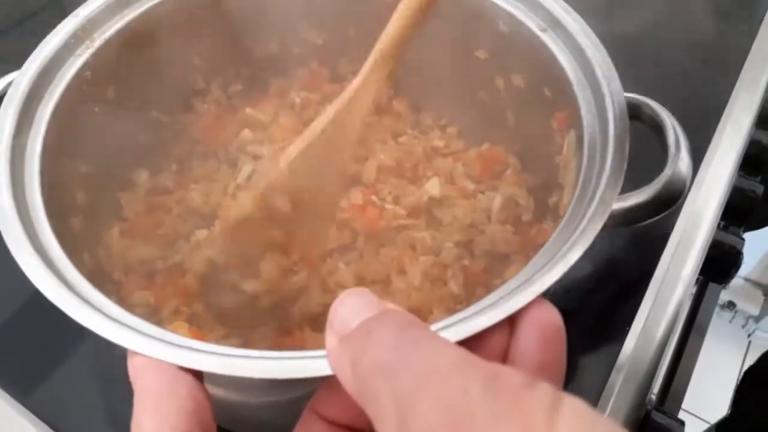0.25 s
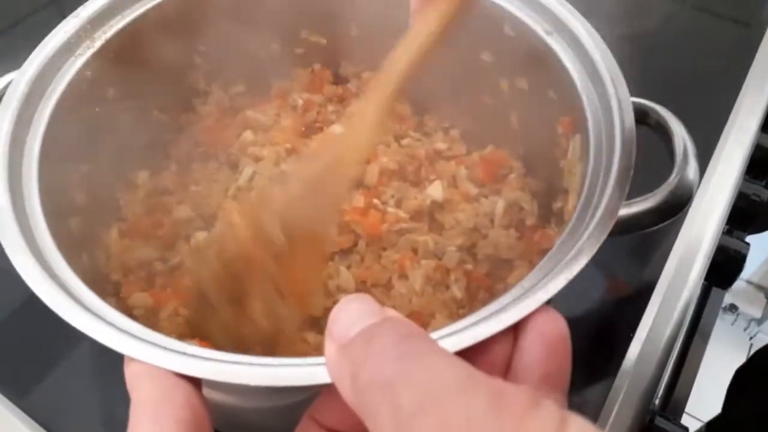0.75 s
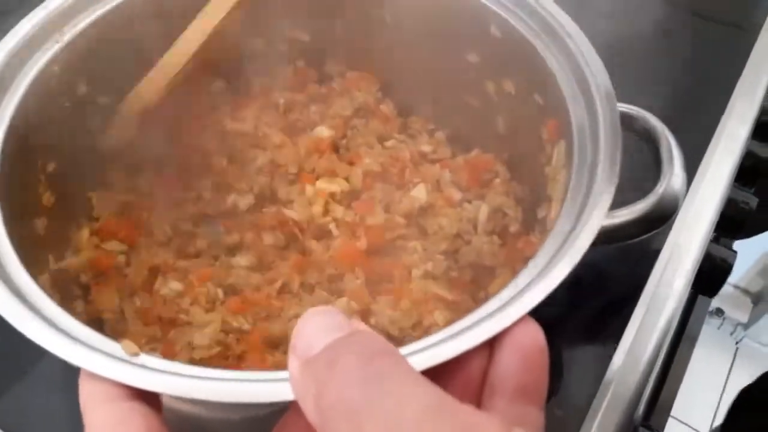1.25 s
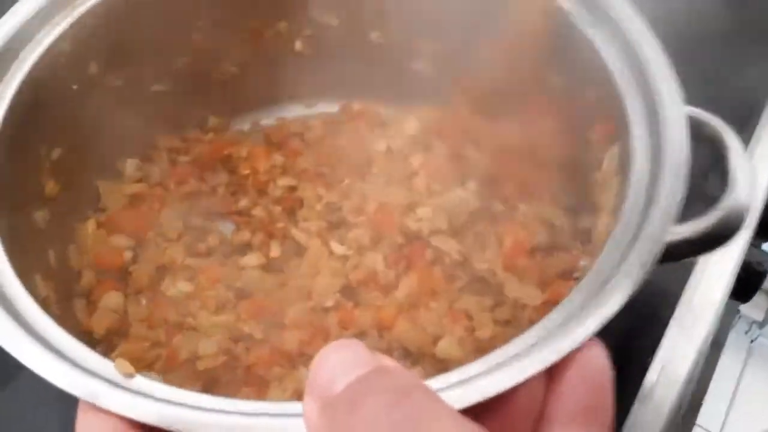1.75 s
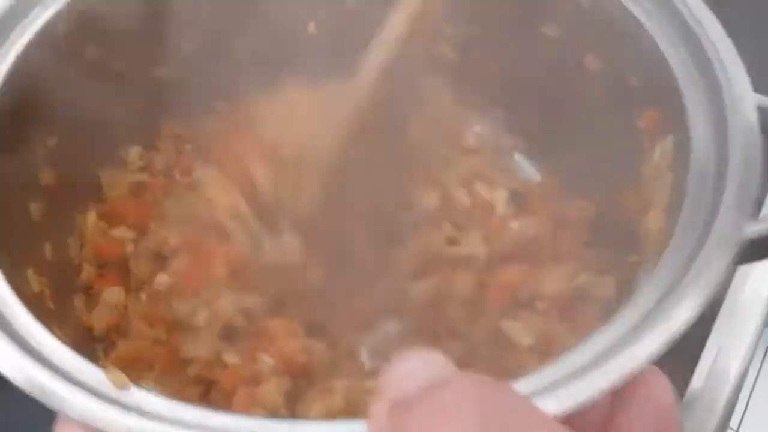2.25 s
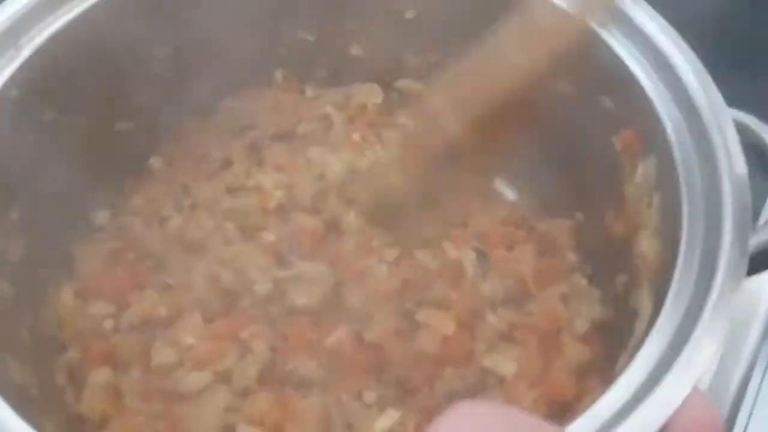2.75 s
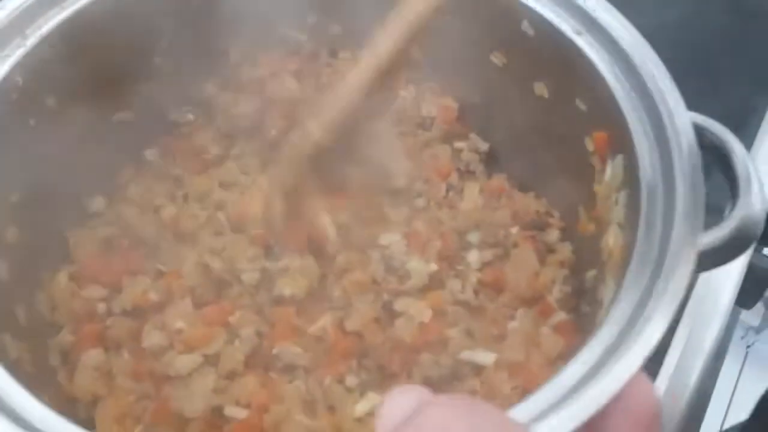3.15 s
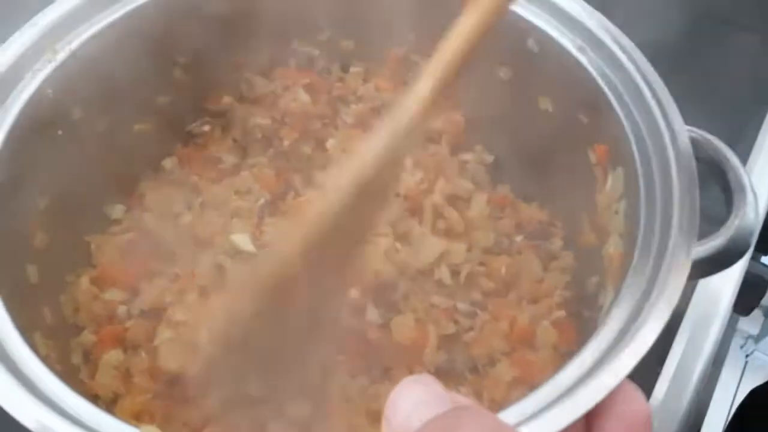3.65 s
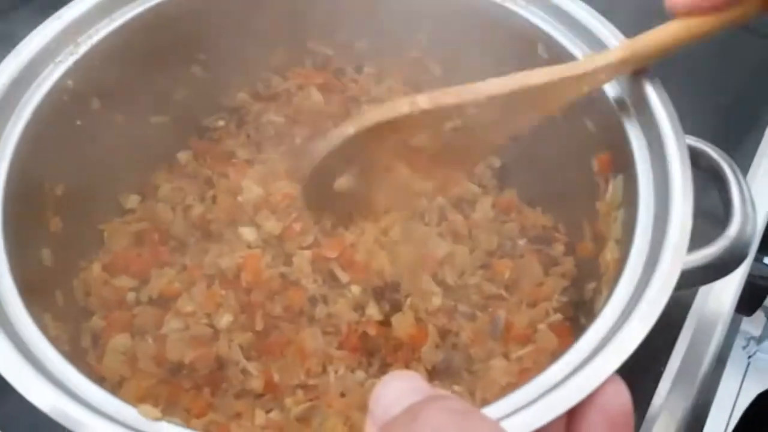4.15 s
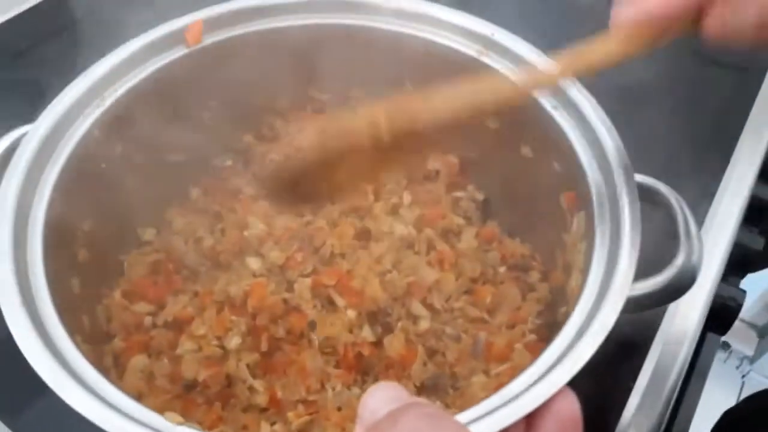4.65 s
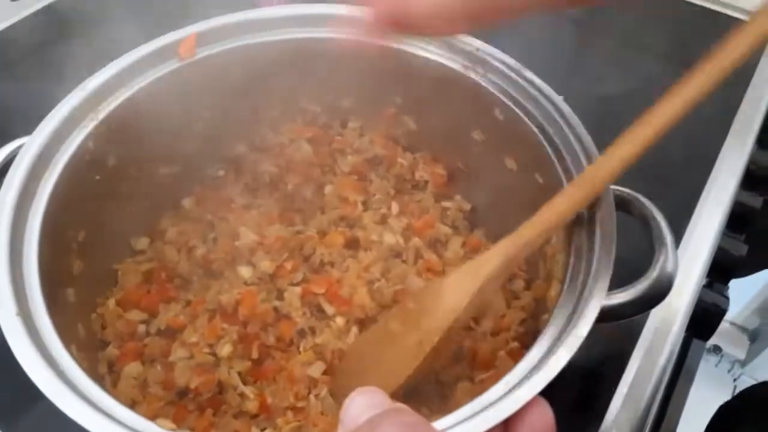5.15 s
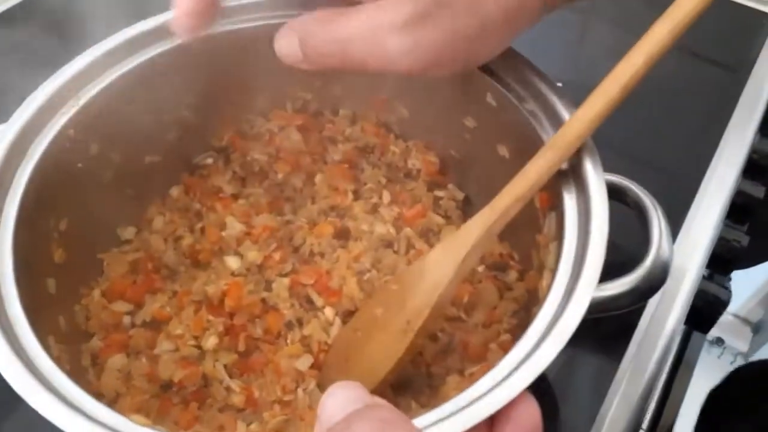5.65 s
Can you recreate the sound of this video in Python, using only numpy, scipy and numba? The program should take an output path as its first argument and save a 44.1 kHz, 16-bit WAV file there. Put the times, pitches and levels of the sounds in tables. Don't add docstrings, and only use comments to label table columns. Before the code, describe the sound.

A wooden spoon knocks and scrapes inside a sizzling steel pot, spitting steam, then five ringing raps on the rim as the frying goes on.

```python
import sys
import numpy as np
from scipy import signal
from scipy.fft import rfft, irfft
from scipy.io import wavfile
from numba import njit

SR = 44100
rng = np.random.default_rng(int(sys.argv[2]) if len(sys.argv) > 2 else 0)


def unload_audio(sound):
    columns = np.transpose(np.atleast_2d(sound))
    steps = np.round(np.clip(columns, -1, 1) * 32767)
    wavfile.write(sys.argv[1], SR, steps.astype(np.int16))


def gain_from_decibels(decibels):
    exponent = np.asarray(decibels, float) / 20
    return 10 ** exponent


N = 259308

# start_s, force_db, hardness_db, pot_air_db
KNOCKS = [(0.1184, -30, -2.5, 1.5), (0.3484, -30, -21.5, -10.5), (0.6161, -29, -10.5, -11.5),
          (0.836, -23.5, -7, -10.5), (1.03, -47, -11, -7), (1.3142, -36.5, -18, -16),
          (1.605, -29, -4.3, -14.5), (1.7174, -37.5, -15, -13), (1.7988, -41.5, -7, -9),
          (2.0857, -38.5, -15, -14), (5.039, -49, -10, -13), (5.8496, -47.5, -19, -17)]
# start_s, force_db, hardness_db, pot_air_db
BUMPS = [(2.3049, -31, -16, -21), (2.396, -43, -4, 0), (2.4625, -21.5, -9.5, -16), (2.4824, -55, -11, -4),
         (2.515, -30.5, -6, -12), (2.548, -18.5, -9.5, -15), (2.5638, -21.5, -9, -17), (2.583, -22, 7, 3.5),
         (2.592, -22, -9, -12), (2.6155, -24.5, -18, -21), (2.639, -37, -23, -19),
         (2.9495, -34.5, -25, -10), (5.5401, -38, -16, -13), (5.7323, -44.5, -15, -18)]
# start_s, force_db, hardness_db, pot_air_db
STRIKE = [
    (2.8151, -21, 6, 6),
]
# start_s, force_db, hardness_db, pot_air_db
RAPS = [
    (3.9634, -22.5, 1.5, 9),
    (4.1662, -24.5, 4, 11),
    (4.36, -25.5, 5, 10.5),
    (4.547, -24.5, 2, 11.5),
    (4.734, -27.5, 2, 13.5),
]
# pitch_hz, left_minus_right_db
FRY_LEAD = [(60, -1.5), (110, 3.5), (200, 0), (380, 2), (700, 3), (1290, 10.5), (2380, 7), (4400, 1),
            (8120, 6.5), (15000, -9)]
# pitch_hz, level_db (per Hz)
FLOOR = [(30, -7.5), (58, -11.5), (86, 0.5), (130, -4.5), (255, -0.5), (420, -20), (850, -34), (1000, -31),
         (1150, -23.5), (1750, -22.5), (5000, -24.5), (8300, -26.5), (9200, -37), (16000, -30)]


def unit(x):
    return x / np.sqrt(np.mean(x ** 2))


def on_log(hz, table):
    table_hz, value = np.transpose(table)
    return np.interp(np.log(hz + 1), np.log(table_hz), value)


def colour(x, table):
    gain = gain_from_decibels(on_log(np.linspace(0, SR / 2, 1025), table))
    cepstrum = irfft(np.log(gain))
    cepstrum[1:1024] *= 2
    cepstrum[1025:] = 0
    response = irfft(np.exp(rfft(cepstrum)))
    return signal.oaconvolve(x, response[None], axes=1)[:, :N]


def band(x, lo_hz, hi_hz):
    return signal.sosfilt(signal.butter(3, [lo_hz, hi_hz], "band", fs=SR, output="sos"), x)


def curve(spans):
    t = np.arange(N) / SR
    return sum(gain_from_decibels(np.interp(t, *np.transpose(span), left=-200, right=-200)) for span in spans)


def pair(likeness):
    mid, side = rng.standard_normal((2, N))
    share = np.clip(likeness, 0, 1)
    opposite = np.array([[1], [-1]])
    return np.sqrt((1 + share) / 2) * mid + np.sqrt((1 - share) / 2) * side * opposite


def grains(per_s, spread_db):
    hit, size, sign = rng.random(N), rng.exponential(size=N), rng.standard_normal(N)
    return unit((hit < per_s / SR) * gain_from_decibels(spread_db * size) * np.sign(sign))


def fading(push, t60):
    return signal.lfilter([1], [1, -np.exp(-np.log(1000) / (t60 * SR))], push)


def ports(x, lead):
    half = np.array(lead) * [1, 0.5]
    return np.vstack([colour(x[:1], half), colour(x[1:], half * [1, -1])])


@njit
def walls(x, lags, gain, damp):
    line, soft, out = np.zeros((8, 4096)), np.zeros(8), np.zeros((2, len(x)))
    for i in range(len(x)):
        total = 0.
        for k in range(8):
            soft[k] += (1 - damp) * (gain[k] * line[k, (i - lags[k]) & 4095] - soft[k])
            total += soft[k]
            out[k % 2, i] += soft[k]
        for k in range(8):
            line[k, i & 4095] = x[i] + soft[k] - total / 4
    return out


def shake():
    push = np.zeros(N)
    for hits, db in ((RAPS, -5.5), (KNOCKS + BUMPS + STRIKE, -20.5)):
        s, force = np.transpose(hits)[:2]
        push[(s * SR).astype(int)] = gain_from_decibels(force + db)
    return fading(push, 0.63) - fading(push, 0.13)


def hob_hum():
    hum = colour(pair(1.0), FLOOR)
    rumble = unit(band(hum, 20, 176)) * (gain_from_decibels(-53) + shake())
    return rumble + gain_from_decibels(-58.5) * unit(band(hum, 135.6, 490))


def frying():
    # time_s, level_db
    sizzle = [(0.0, -48), (0.83, -47), (1.24, -46.5), (1.75, -44.5), (2.13, -45.5), (2.54, -40),
              (2.85, -48.5), (3.22, -53), (3.8, -51.5), (4.1, -49.5), (4.9, -54), (5.88, -51.5)]
    bubbles = unit(colour(pair(0.082) + 0.16 * grains(1500, 1.3), FLOOR))
    return unit(band(bubbles, 520, 14000)) * curve([sizzle])


def kitchen():
    microphones = unit(band(pair(0.27), 15700, 17700)) * gain_from_decibels(-70.5)
    return ports(frying() + hob_hum(), FRY_LEAD) + microphones


def spits():
    # start_s, peak_db
    juice = [(0.614, -31), (0.858, -32), (0.978, -35), (1.053, -20), (1.2733, -27.5), (1.3094, -18),
             (1.5595, -37), (1.593, -26.5), (1.605, -29), (1.6196, -14), (1.637, -24), (1.71, -31.5),
             (1.829, -32), (1.858, -34), (2.079, -26), (2.308, -17), (2.3167, -17.5), (2.353, -23.5),
             (2.936, -19), (3.032, -27.5), (3.2613, -16)]
    # start_s, peak_db
    drops = [
        (4.003, -17),
        (4.025, -25),
        (4.0422, -20.5),
    ]
    # start_s, peak_db
    patches = [
        (2.3258, -16.5),
        (2.947, -24),
        (2.96, -25.5),
        (2.975, -23),
        (2.997, -30.5),
        (3.271, -36),
    ]
    # pitch_hz, level_db (per Hz)
    steam = [(1470, -29), (2500, -8.5), (4200, -12.5), (5200, 3.5), (6950, 6.5), (8010, 5.5), (9830, -9),
             (15200, -9), (16000, -35), (16400, -37)]
    age, body = np.arange(SR // 4) / SR, np.zeros(N)
    for events, decay_s in ((juice, 0.011), (drops, 0.0068), (patches, 0.015)):
        for s, db in events:
            start = int(s * SR)
            body[start:start + len(age)] += gain_from_decibels(db) * (1 - np.exp(-age / 0.00083)) * np.exp(-age / decay_s)
    fizz = unit(colour(pair(0.08) + 0.5 * grains(1700, 1.5), steam))
    return gain_from_decibels(-6.5) * body * fizz


def strokes(gritty):
    # start_s, hardest_s, end_s, pressure_db, grit_db
    drags = [
        (0.898, 1.03, 1.35, -40, -7.5),
        (1.628, 1.78, 1.95, -40.5, -3),
        (2.054, 2.338, 3.6, -32, -13),
        (2.453, 2.578, 2.732, -20, -0.5),
    ]
    ends_db = -19.5
    spans = []
    for start, hardest, end, pressure, grit in drags:
        db = pressure + gritty * grit
        spans.append([(start, db + ends_db), (hardest, db), (end, db + ends_db)])
    return curve(spans)


def spoon_rasp(slips):
    shape = [(400, 9.5), (1200, -3.5), (3000, -4.5), (8000, -16.5), (10000, -72)]
    return strokes(gritty=0.94) * unit(colour(0.49 * slips + pair(0.29), shape))


def zones(hits, knock_db, crack_db):
    s, force, hard, air = np.transpose(hits)
    thump, hollow, clank = force, force + air, force + hard
    knock = force + knock_db + 0.65 * hard
    crack = force + crack_db + hard
    return s, np.array([thump, knock, hollow, clank, crack])


def ring(push, hz, t60, rise=0):
    turn = np.exp(2j * np.pi * hz / SR)
    z = signal.lfilter([1], [1, -turn * np.exp(-np.log(1000) / (t60 * SR))], push)
    if rise:
        z = z - signal.lfilter([1], [1, -turn * np.exp(-np.log(1000) / (rise * SR))], push)
    lag = np.exp(1j * min(hz / 1600, 1.6) * rng.uniform(-1.57, 1))
    return np.array([z.imag, (z * lag).imag])


def steel(hits, modes, hollow, wash_db, crack_db, scatter_db, rub=0, wash_time=1.0, soft_hz=6000):
    # low_hz, high_hz, level_db, t60_s
    blurs = [(73, 103, -15, 1), (145, 394, -1, 0.53), (420, 1040, -2.5, 0.35), (1020, 1330, -16, 0.35),
             (1330, 2830, -7, 0.38), (2850, 4520, -17.5, 0.4), (4660, 7920, -27, 0.62)]
    contact_s, swell_s = 0.0006, 0.01
    s, zones_db = hits
    at = ((s + contact_s) * SR).astype(int)

    def blows(hz, db):
        push = np.zeros(N)
        push[at] = gain_from_decibels(zones_db[np.searchsorted([449, 900, 1450, 3100], hz)] + db)
        return push

    out = 0
    for table, rise in ((modes, 0), (hollow, swell_s)):
        for hz, db, t60 in table:
            luck = np.clip(rng.standard_normal(len(s)), -2, 1.2)
            push = blows(hz, db + scatter_db * luck)
            if hz < 500:
                push = push + gain_from_decibels(db) * rub
            out = out + ring(push, hz, t60, rise)
    out = signal.sosfilt(signal.butter(2, soft_hz, fs=SR, output="sos"), out)
    for lo, hi, db, t60 in blurs:
        push = blows(np.sqrt(lo * hi), db + wash_db)
        swell = fading(push, t60 * wash_time) - fading(push, 0.0022)
        out = out + swell * unit(band(pair(1.05 - lo / 1200), lo, hi))
    crack = fading(blows(SR / 2, crack_db), 0.033) * pair(0.13)
    return out + colour(crack, [(500, -7.5), (1500, 9.5), (4000, -2), (8000, -6.5), (9800, -25), (16000, -80)])


def base_knocks():
    # pitch_hz, level_db, t60_s
    modes = [(171.6, -0.5, 0.45), (231.7, -4, 0.31), (345.6, -4.5, 0.31), (445.5, -1.5, 0.083),
             (773, -18, 0.11), (948, -5.5, 0.21), (1554, -14, 0.4), (2290, -9, 0.21), (2486, -16, 0.039)]
    # pitch_hz, level_db, t60_s
    hollow = [(313.5, -1.5, 0.064), (786, 7, 0.021), (1223, 9, 0.066), (1632, -4.5, 0.054),
              (1935, -9, 0.024), (2125, 3, 0.037), (2435, 2, 0.041), (2650, 13.5, 0.04), (3300, 6, 0.048)]
    return steel(zones(KNOCKS, knock_db=0.5, crack_db=-1.5), modes, hollow,
                 wash_db=-6, crack_db=9, scatter_db=1.3)


def wall_blows(slips):
    # pitch_hz, level_db, t60_s
    modes = [(177, -10.5, 0.31), (250.4, -3.5, 0.18), (349, 0, 0.26), (570, -8, 0.21), (684, -8.5, 0.093),
             (752, -9, 0.1), (818, -13, 0.15), (979, -10.5, 0.22), (1226, -3.5, 0.08), (1637, -16, 0.17),
             (1825, -15, 0.12), (2240, -12.5, .22), (2700, -7, 0.083)]
    # pitch_hz, level_db, t60_s
    hollow = [(307.6, 3, 0.083), (433, -3.5, 0.086), (1124, 10, 0.02), (1400, -5, 0.025), (1628, 6, 0.025),
              (1832, 9, 0.025), (2315, 6, 0.033), (3590, 1.5, 0.041)]
    damped = [(hz, db, t60 * (0.64 if hz > 900 else 1)) for hz, db, t60 in modes]
    strike = steel(zones(STRIKE, knock_db=-3, crack_db=-9), modes, hollow,
                   wash_db=-10, crack_db=4.5, scatter_db=3.5)
    judder = steel(zones(BUMPS, knock_db=0.5, crack_db=0.5), damped, hollow,
                   wash_db=-4.5, crack_db=6, scatter_db=3.5,
                   rub=gain_from_decibels(-40.5) * strokes(gritty=0) * slips, wash_time=0.7)
    return strike + judder


def rim_raps():
    # pitch_hz, level_db, t60_s
    modes = [(161.7, 5, 0.31), (237, -9, 0.57), (311, -7.5, 0.16), (342.2, -3.5, 0.35), (520, -13.5, 0.34),
             (1170, -25, 0.18), (1230, -16, 0.11), (1590, -3.5, 0.22), (1890, -19.5, 0.45),
             (2457, -4, 0.12), (3300, -3, 0.024), (4070, -8, 0.025)]
    # pitch_hz, level_db, t60_s
    beating = [(2822, -8, .3), (2866, -8, .31)]
    # pitch_hz, level_db, t60_s
    hollow = [(288, -18, 0.064), (830, -7, 0.039), (1201, 8.5, 0.05), (1854, 10.5, 0.026),
              (2773, 2.5, 0.035)]
    return steel(zones(RAPS, knock_db=-5, crack_db=4.5), modes + beating, hollow,
                 wash_db=0, crack_db=7, scatter_db=1.25, soft_hz=9500)


def scene():
    # pitch_hz, left_minus_right_db
    pot_lead = [(60, 6), (110, 2.5), (200, 4), (380, 1.5), (700, 4), (1290, 10.5), (2380, 6), (4400, 4.5),
                (8120, 6.5), (15000, -35.5)]
    slips = grains(700, 0.73)
    pot = base_knocks() + wall_blows(slips) + rim_raps() + spoon_rasp(slips)
    near = ports(pot, pot_lead) + ports(spits(), FRY_LEAD)
    near[0] = np.roll(near[0], 6)
    room_t60_s = 0.38
    lags = rng.integers(300, 2200, 8)
    room = walls(near.mean(axis=0), lags, gain_from_decibels(-60 * lags / SR / room_t60_s), 0.038)
    room = band(room, 243, 22000) + band(room.sum(axis=0), 55, 390)
    return near + gain_from_decibels(-17.5) * room + kitchen()


def low_pass(x):
    return signal.sosfilt(signal.butter(12, 17000, fs=SR, output="sos"), x)


def record(dry):
    rounded = np.tanh(0.84 * dry) / 0.97
    mix = signal.sosfilt(signal.butter(4, 60, "high", fs=SR, output="sos"), rounded)
    mix = signal.sosfilt(signal.ellip(8, 0.2, 70, 15850, fs=SR, output="sos"), mix)
    return low_pass(mix)


dry = scene()
out = record(dry)
unload_audio(out)
```